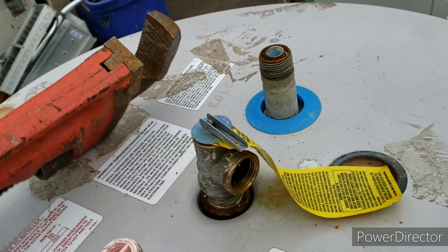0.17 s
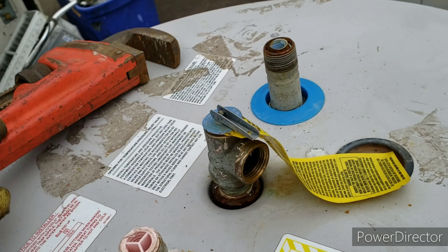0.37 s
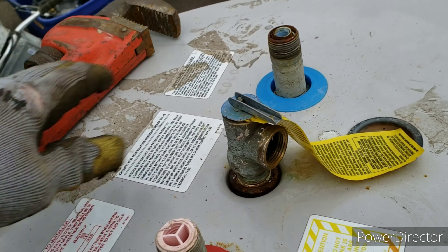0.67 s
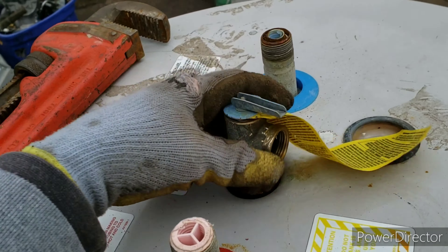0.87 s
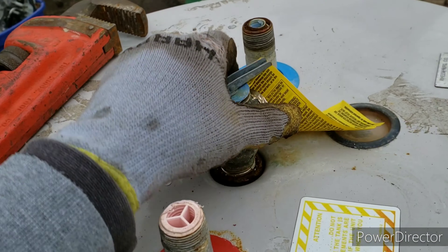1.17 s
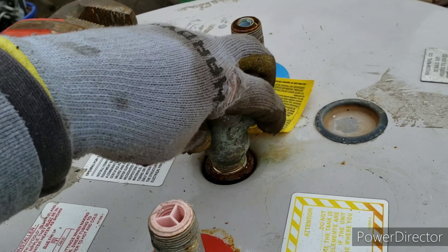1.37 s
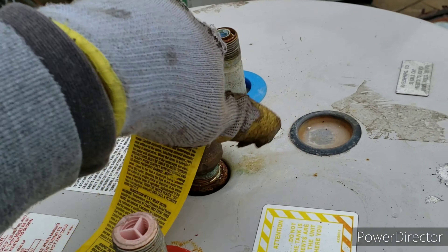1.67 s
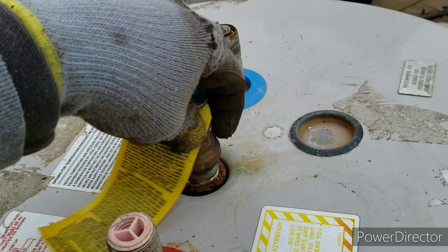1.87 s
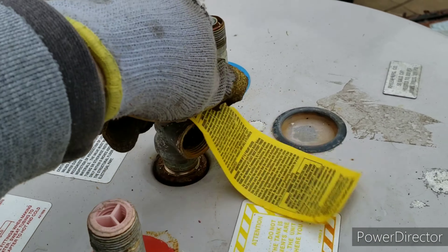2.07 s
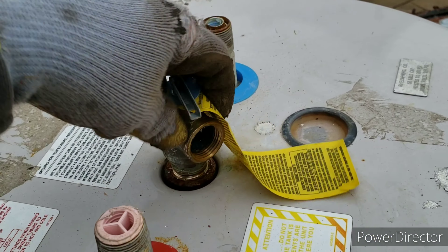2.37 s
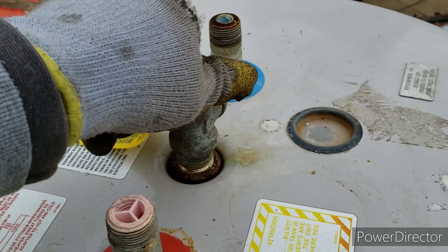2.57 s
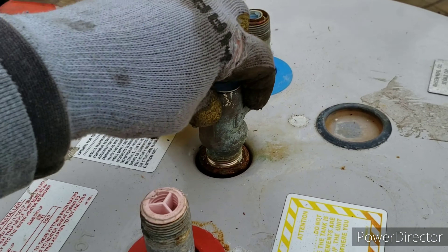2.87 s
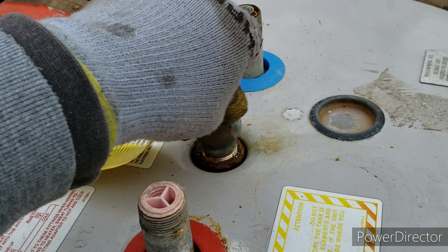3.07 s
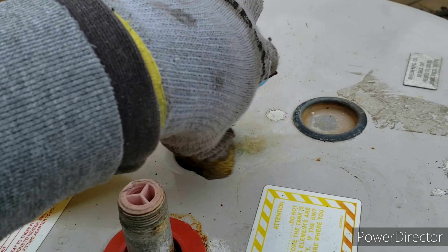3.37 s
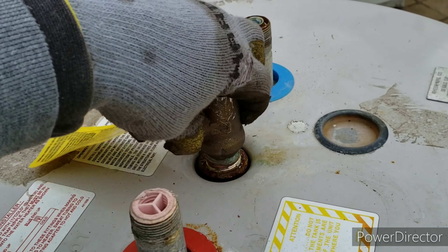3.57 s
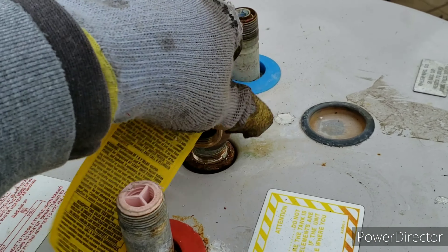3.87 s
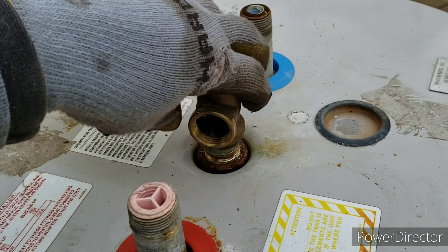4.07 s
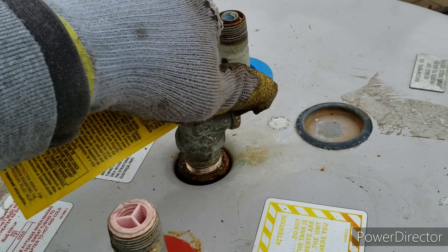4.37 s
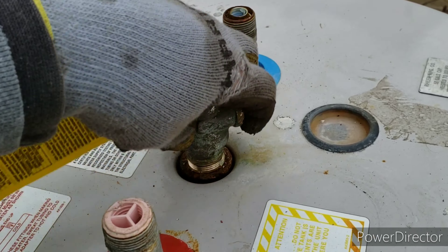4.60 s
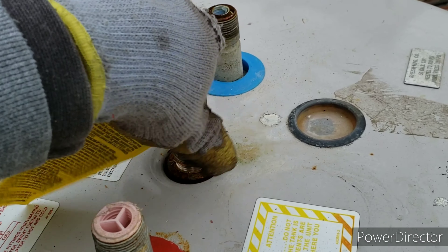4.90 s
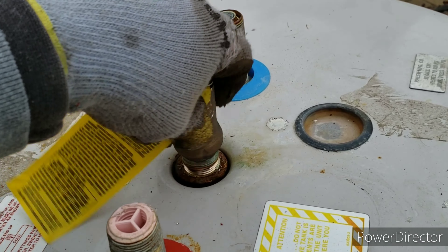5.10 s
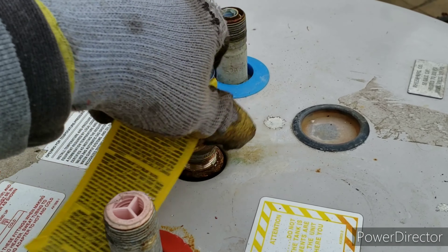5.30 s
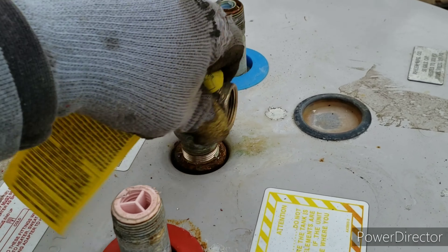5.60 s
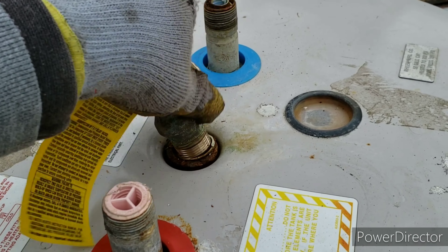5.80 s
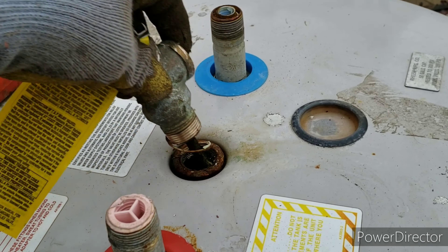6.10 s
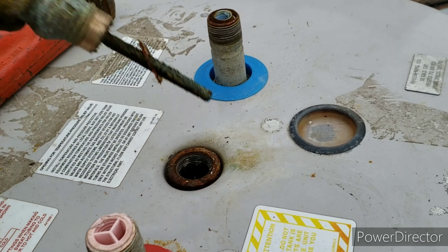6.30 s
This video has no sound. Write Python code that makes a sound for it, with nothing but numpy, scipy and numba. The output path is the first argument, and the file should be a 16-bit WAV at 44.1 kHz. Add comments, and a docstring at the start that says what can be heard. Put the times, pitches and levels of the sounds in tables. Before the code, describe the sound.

Outdoors, close to a metal tank, heard by a phone in near, dry stereo. At 0 seconds a steel wrench knocks and scrapes the sheet-metal lid: a sharp clank at 0.1, lighter taps, then from 0.4 to 0.95 a crowded, uneven clatter of bright ringing steel, hollow lid knocks and dull thuds, with a rough drag near 0.53. The rings are short, and it dies away by 1.1. From there a much quieter gloved hand works a threaded valve: gritty rubs and crackles, snapping around 2.0, 2.6, 3.2 and 3.7, sparse between. From 4.3 to 5.9 the strokes come closer together, fuller and scratchier, strongest near 5.25, with crisp ticks of scale. Near 6.3 a thin rod sings very faintly and high as it slides out. Soft swelling rumble, light hiss and a faint wavering hum, dropping lower around 3.7, continue to the end at about 6.4.

```python
"""Outdoors at a tank: a steel wrench is knocked and dragged on the sheet-metal lid, ringing damped modes.
Then a gloved hand works a threaded brass valve loose: noise grains make gritty rubbing and crackles of scale,
and a thin rod sings faintly as it slides out. Filtered noise gives low rumble and hiss, sines a faint far hum.
A phone with two microphone ports lies close by; the sound reaches the left port first."""
import sys
import numpy as np
from scipy import signal
from scipy.fft import rfft, irfft, next_fast_len
from scipy.io import wavfile
from scipy.ndimage import uniform_filter1d
from numba import njit

SR = 44100
rng = np.random.default_rng(int(sys.argv[2]) if len(sys.argv) > 2 else 0)


def int16_out(signal):
    """Quantize to a 16-bit WAV file."""
    q = np.round(np.clip(np.atleast_2d(signal).T, -1, 1) * 32767)
    wavfile.write(sys.argv[1], SR, q.astype(np.int16))


def natural_amplitude(level_db):
    """Convert a level in decibels to a linear amplitude factor, elementwise."""
    exponent = np.asarray(level_db, float) / 20
    return 10 ** exponent


N = 284445
T = np.arange(N) / SR

# spectrum of gritty contact: freq_hz, relative_level_db
GRIT_SPECTRUM = [(180, -31), (300, -1.5), (504, -6), (848, 1.5), (1580, 1.5), (2790, -4), (5100, -8),
                 (9010, -15.5), (12000, -6.5), (14700, -5), (15700, -5.5), (16500, -36.5)]
# strokes of the glove and turns of the thread: peak_s, level_db, low_band_body_db (relative to level_db),
# rise_ms per 9 dB, fall_ms per 9 dB
STROKE_ROWS = [(1.139, -50.5, 1, 59, 45), (1.277, -57, -9, 2, 10), (1.436, -35, -11.5, 11.3, 29),
               (1.541, -40, -15, 15, 55), (1.621, -47.5, -5.5, 51, 67), (1.801, -61, -34, 25, 17),
               (1.89, -53, -3.5, 1.5, 130), (1.965, -52, -5, 40, 18), (2.098, -33.5, -25.5, 39, 12),
               (2.186, -43.5, -9.5, 12.4, 25.5), (2.389, -57, -6, 1.9, 15), (2.619, -31.5, -10, 62, 17),
               (2.721, -50, -11, 20, 37), (2.858, -47.5, -1, 1.5, 45), (3.22, -48.5, -1, 97, 90),
               (3.403, -45.5, -10, 43, 54), (3.612, -54, -7, 44, 45), (3.697, -30.5, -8.5, 5.2, 14),
               (3.789, -54, 10.5, 30, 18), (3.858, -48.5, -2.5, 76, 35), (4.04, -49.5, -6.5, 120, 100),
               (4.303, -52.5, 1.5, 34, 36), (4.398, -38, -10, 18, 31), (4.56, -37, -5.5, 22, 20),
               (4.644, -54.5, -1.5, 5.6, 128), (4.809, -36.5, 1.5, 15.7, 24), (4.9, -49.5, -1.5, 52, 43),
               (4.977, -41.5, 2, 23.4, 39), (5.124, -46, 3, 45, 25), (5.251, -30, -6, 19.8, 20.7),
               (5.386, -41, -4.5, 50, 15), (5.434, -50.5, -11, 13, 37), (5.554, -59.5, 3.5, 38, 85),
               (5.744, -43, 3.5, 83, 47), (5.916, -39.5, -7.5, 31, 41), (6.316, -52, 2.5, 113, 20)]


def unit(x):
    """Scales to rms 1."""
    return x / np.sqrt(np.mean(x ** 2))


def curve(rows):
    """Interpolates the columns of a time table to one value a sample."""
    s, *columns = np.transpose(rows)
    return [np.interp(T, s, column) for column in columns]


def colour(x, points, lag_s=0., scale=0.95):
    """Filters by (Hz, dB) points on a log axis, dB times scale, with an optional delay."""
    size = next_fast_len(N + 4096)
    hz = np.fft.rfftfreq(size, 1 / SR) + 1
    at_hz, db = np.transpose(points)
    gain = natural_amplitude(scale * np.interp(np.log(hz), np.log(at_hz), db))
    delay = np.exp(-2j * np.pi * hz * lag_s)
    return irfft(rfft(x, size) * gain * delay, size)[..., :N]


def band(x, lo_hz, hi_hz):
    """Steep band-pass."""
    return signal.sosfilt(signal.butter(3, [lo_hz, hi_hz], "band", fs=SR, output="sos"), x)


def walk(rate_hz):
    """Random levels held 1 / rate_hz and slewed; spread near 1."""
    hold = max(int(SR / rate_hz), 1)
    steps = np.repeat(rng.standard_normal(N // hold + 1), hold)
    return 1.096 * uniform_filter1d(steps, hold)[:N]


@njit
def resonate(push, pole, keep):
    """One damped mode; keep under 1 takes more ring away on that sample."""
    out, z = np.empty(len(push)), 0j
    for i in range(len(push)):
        z = z * pole * keep[i] + push[i] + 1e-18
        out[i] = z.imag
    return out


def ring(pushes, modes, keep):
    """Sums damped modes, each driven by its own row of pushes."""
    out = 0
    for push, (hz, db, t60_s) in zip(pushes, modes):
        decay = np.log(1000) / (max(t60_s, .005) * SR)
        pole = np.exp(2j * np.pi * hz / SR - decay)
        out = out + natural_amplitude(db) * resonate(push, pole, keep)
    return out


def strikes(times_s, db, modes, scatter_db):
    """A blow and two quick bounces on each mode; where it lands changes size and sign."""
    pushes = np.zeros((len(modes), N))
    late_s = rng.uniform(0.0013, .005, (len(times_s), 2)).cumsum(axis=1).T
    for after_s, bounce_db in zip([0., *late_s], (0, -7, -11)):
        chance = rng.standard_normal((len(times_s), 2 * len(modes)))
        sizes = natural_amplitude(scatter_db * chance[:, ::2]) * np.sign(chance[:, 1::2])
        at = ((times_s + after_s) * SR).astype(int)
        pushes[:, at] += (natural_amplitude(db + bounce_db)[:, None] * sizes).T
    return pushes


def bursts(times_s, db, rise_ms, fall_ms):
    """Envelope of bursts: exponential rise to the peak and fall after it, 9 dB in the given times."""
    env = np.zeros(N)
    for s, d, rise, fall in zip(times_s, db, np.clip(rise_ms, .1, 400), np.clip(fall_ms, .3, 400)):
        start = max(int((s - rise * 0.003) * SR), 0)  # 27 dB under the peak
        end = int((s + fall * 0.012) * SR)
        ms = (T[start:end] - s) * 1000
        env[start:end] += natural_amplitude(d + 9.01 * np.minimum(ms / rise, -ms / fall))
    return env


def wrench():
    """Blows and a chattering drag ring the steel and the lid; blows also thud the tank."""
    # blows: start_s, steel_db, lid_db, thud_db (relative levels)
    blow_rows = [(0.008, -31, -43, -73), (0.0827, -43, -22.5, -31.5), (0.0994, -12, -73, -55),
                 (0.152, -45, -34, -38), (0.227, -44.5, -26, -65), (0.349, -53, -29.5, -57.5),
                 (0.4122, -26, -19.5, -44), (0.422, -13.5, -25.5, -39), (0.432, -7, -27, -60),
                 (0.456, -8.5, -30.5, -64.5), (0.491, -11.5, -21, -61), (0.506, -15.5, -37, -59.5),
                 (0.521, -16.5, -31.5, -20), (0.528, -14, -27, -31.5), (0.541, -12, -34, -39),
                 (0.553, -13, -35.5, -61), (0.595, -20.5, -19.5, -52), (0.651, -29.5, -20.5, -28.5),
                 (0.663, -25, -20.5, -36.5), (0.672, -12, -20.5, -52.5), (0.679, -23.5, -30, -69),
                 (0.724, -19, -38.5, -60), (0.74, -17.5, -20.5, -34), (0.784, -18, -17.5, -70),
                 (0.795, -31, -20.5, -32), (0.81, -33, -39, -61), (0.839, -17.5, -27.5, -60),
                 (0.856, -26, -21, -34), (0.89, -50, -17, -55), (0.917, -23, -24.5, -40),
                 (0.941, -42.5, -25.5, -64), (0.96, -25, -31, -47), (1.04, -39, -39.5, -52),
                 (1.07, -49, -62, -48)]
    # drags across the lid: peak_s, steel_db, lid_db (relative levels), rise_ms per 9 dB, fall_ms per 9 dB
    drag_rows = [(0.01, -24.5, -55, 5, 13.4), (0.1, -21.5, -32, 9.4, 44), (0.222, -47.5, -33, 3, 126),
                 (0.418, -23.5, -18, 2.5, 27), (0.536, -13, -9.5, 27, 15), (0.58, -37.5, -34, 79, 390),
                 (0.68, -25, -33.5, 17, 86), (0.892, -28.5, -32, 200, 82)]
    # modes of wrench, lid and tank body: freq_hz, relative_level_db, t60_s (before damping by hand and blows)
    steel_modes = [(951, -7, .5), (1367, -19, .15), (1614, -14, .3), (1911, -2, .35), (2863, -9, .3),
                   (2988, -12, .2), (3085, 1, .16), (3147, 1, .25), (3260, 1, .06), (3420, 1, .04),
                   (3600, 2, .04), (3850, -4, .03), (4242, -10, .2), (4546, -4, .28), (4678, -10, .25),
                   (5900, -12, .1), (6170, -3, .3), (6370, -3, .25), (7786, -4, .12), (8785, -13, .2),
                   (9453, -21, .2), (10152, -21, .2), (10778, -13, .25), (10895, -8, .15), (11080, -12, .1),
                   (13105, -15, .15), (13342, -10, .2), (13555, -12, .15), (13786, -13, .25),
                   (14935, -17, .15)]
    lid_modes = [(511.5, -12.5, .12), (612.6, -7.5, 0.087), (671, -2.5, 0.074), (750, -3.5, 0.052),
                 (852, -3, 0.05), (1063, -8, 0.04), (1410, -7.5, 0.023)]
    tank_modes = [(70, -2.5, 0.11), (167, -11, .05), (277, -8, 0.062)]
    s, db, lid_db, thud_db = np.transpose(blow_rows)
    peak_s, drag_steel_db, drag_lid_db, rise_ms, fall_ms = np.transpose(drag_rows)

    lift_s, lift_fade_s = 1.132, 0.08  # the wrench leaves the lid
    on_lid = np.clip((lift_s - T) / lift_fade_s, 0, 1)
    drag_steel = bursts(peak_s, drag_steel_db, rise_ms, fall_ms) * on_lid
    drag_lid = bursts(peak_s, drag_lid_db, rise_ms, fall_ms) * on_lid
    chatter = unit(natural_amplitude(6.2 * walk(150)) * rng.standard_normal(N))

    undamped = np.ones(N)
    lid_pushes = strikes(s, lid_db - 2.5, lid_modes, 1.9) + chatter * drag_lid * natural_amplitude(-32.0)
    lid = ring(lid_pushes, lid_modes, undamped)
    thud = ring(strikes(s, thud_db + 4.5, tank_modes, 0.74), tank_modes, undamped)

    # the hand damps the steel by 70 dB/s; a hard blow stops part of the earlier ring
    keep = np.full(N, natural_amplitude(-70 / SR))
    keep[(s * SR).astype(int)] = np.clip(1 - 0.95 * natural_amplitude(db + 16.5), .45, 1)
    steel_pushes = strikes(s, db - 10, steel_modes, 2.1) + chatter * drag_steel * natural_amplitude(-42.0)
    steel = ring(steel_pushes, steel_modes, keep)

    # the contact itself cracks and scrapes broadband
    crack = bursts(s, db - 10.5, np.full(len(s), .3), np.full(len(s), 4.))
    scrape = drag_steel * natural_amplitude(-9.5 + 5.17 * walk(200))
    grit = unit(band(colour(rng.standard_normal(N), GRIT_SPECTRUM), 900, 13000))
    return band(steel + lid, 190, 17000) + band(thud, 42, 2000) + (crack + scrape) * grit


def valve():
    """Grit in the thread and the glove: grains shared by three bands, under rubbing and crackles."""
    # crackles: peak_s, mid_db, low_db, high_db (relative levels), fall_ms per 9 dB (scaled by band below)
    crackle_rows = [(1.126, -36.5, -32, -35, 2.3), (1.139, -32, -34, -37, 3.9),
                    (1.2754, -35.5, -39.5, -43.5, 4), (1.458, -29, -36.5, -29.5, 4.8),
                    (1.5376, -36, -62, -30.5, 8.2), (1.6064, -33, -44, -24, 2.6),
                    (1.6187, -28.5, -39, -32.5, 6.8), (1.648, -32, -45, -40.5, 2.4),
                    (1.6813, -33, -42, -39, 2.7), (1.7253, -45.5, -78, -37, 4.6),
                    (1.785, -53, -81, -45, 11), (1.887, -35, -64, -29, 1.7), (1.978, -41, -43, -26.5, 3.8),
                    (1.994, -22.5, -38.5, -18.5, 3.06), (2.0429, -39, -43, -34, 6.8),
                    (2.0583, -47, -53, -27.5, 16), (2.1005, -47, -49.5, -21.5, 8.8),
                    (2.1235, -35.5, -61, -36, 1.7), (2.177, -46, -50, -55, 7.1),
                    (2.3897, -40.5, -51.5, -38.5, 5.5), (2.4294, -48, -51.5, -40, 8.9),
                    (2.5584, -38, -65, -34, 9), (2.5742, -31, -36.5, -39, 3.8), (2.631, -38, -64, -32, 17),
                    (2.709, -41, -58, -32.5, 5.4), (2.8561, -48, -47, -44.5, 1.5),
                    (2.9259, -44, -45, -45, 1.7), (3.0744, -43.5, -51, -47, 3.2),
                    (3.1377, -44, -50.5, -44, 2.5), (3.17, -34.5, -48, -36.5, 4.5),
                    (3.2237, -21.5, -25, -33.5, 3.4), (3.2538, -33, -47, -35.5, 0.87),
                    (3.2751, -29, -34, -25, 0.85), (3.2845, -25.5, -38.5, -23.5, 0.55),
                    (3.3078, -39, -47, -48, 1.3), (3.3972, -31, -59, -29.5, 6.4),
                    (3.4995, -41, -56, -50, 4.3), (3.6147, -39, -43, -39.5, 3.5),
                    (3.6865, -28.5, -49, -23.5, 0.65), (3.7486, -38.5, -46, -27.5, 0.83),
                    (3.7656, -42, -54, -38, 4), (3.7878, -54, -39, -43.5, 3), (3.881, -38.5, -47, -50, 2.6),
                    (4.0086, -34, -63, -41.5, 5.3), (4.0301, -28, -65, -22.5, 3.5),
                    (4.0535, -33.5, -52, -37, 3), (4.1634, -46, -54, -38.5, 2.1),
                    (4.2422, -54, -37.5, -62, 2.8), (4.2777, -42, -33, -69, 0.31),
                    (4.297, -21.5, -32.5, -27.5, 2), (4.4074, -25, -40, -32.5, 0.64),
                    (4.4171, -23, -53, -20.5, 0.9), (4.458, -44.5, -46.5, -45, 5.7),
                    (4.538, -40, -64, -40, 6), (4.5585, -57, -39, -47, 8.7), (4.581, -40, -54, -39.5, 14),
                    (4.6408, -35, -60, -22.5, 0.5), (4.6864, -42, -50, -36.5, 4.2),
                    (4.7766, -19, -49, -22.5, 1.2), (4.8094, -24.5, -25.5, -30.5, 6.6),
                    (4.8408, -31.5, -36, -40, 1.6), (4.9788, -30, -37, -24, 5.7),
                    (5.0168, -22.5, -48, -25.5, 1.3), (5.0573, -36, -53, -37, 9.9),
                    (5.118, -26, -38.5, -21, 1.6), (5.2102, -34, -34, -30.5, 2.5),
                    (5.2281, -19.5, -29, -16.5, 2), (5.2476, -19.5, -32.5, -25.5, 6.5),
                    (5.387, -31, -57, -27, 7.2), (5.43, -52, -68, -28, 2.9),
                    (5.5066, -35.5, -57, -31.5, 1.7), (5.5512, -29.5, -37, -33.5, 4.2),
                    (5.6475, -33.5, -30.5, -49.5, 2.1), (5.6668, -34, -50, -34, 3.2),
                    (5.6961, -40, -48, -41.5, 3.4), (5.748, -24, -24, -29.5, 1),
                    (5.8768, -40, -46, -38.5, 11), (5.8994, -41, -49, -39.5, 2.3),
                    (5.941, -39.5, -50, -35.5, 2.2), (6.0009, -56, -65, -30, 0.9),
                    (6.1056, -42, -61, -53, 2.3), (6.233, -45, -55, -39, 2.3),
                    (6.326, -42.5, -51, -34, 1.5)]
    # edges of the low, middle and high band: freq_hz
    edges_hz = (200, 2500, 9000, 16500)
    snap_low_hz, crackle_low_hz = 700, 450  # snaps and crackles have no bass
    rubs = rubbing()
    s, mid_db, low_db, high_db, fall_ms = np.vstack([crackle_rows, ticks(rubs[1])]).T
    slowness_ms = 0.32 + 0.24 * fall_ms
    grains = colour(natural_amplitude(3.46 * walk(400) + 2.4 * walk(90)) * rng.standard_normal(N), GRIT_SPECTRUM)
    sharp = colour(natural_amplitude(4.63 * walk(1200)) * rng.standard_normal(N), GRIT_SPECTRUM)
    layers = zip((low_db, mid_db, high_db), rubs, (1.6, 1.1, .8))  # low bands linger longer
    out, snaps = 0, np.zeros(N)
    for k, (db, rub, linger) in enumerate(layers):
        lo_hz, hi_hz = edges_hz[k:k + 2]
        out = out + rub * natural_amplitude(2.2 * walk(40)) * unit(band(grains, lo_hz, hi_hz))
        crackle = bursts(s, db + 2.0, 0.58 * slowness_ms, linger * fall_ms)
        out = out + crackle * unit(band(sharp, max(lo_hz, crackle_low_hz), hi_hz))
        # each crackle has a one-sample snap at its peak, stronger the more sudden it is
        snaps[(s * SR).astype(int)] = natural_amplitude(db + 18) / (1 + slowness_ms ** 2)
        out = out + band(snaps, max(lo_hz, snap_low_hz), hi_hz)
    return out


def rubbing():
    """Envelopes of the strokes in the low, middle and high band; less body means a brighter stroke."""
    s, db, body_db, rise_ms, fall_ms = np.transpose(STROKE_ROWS)
    treble_db = -3 - 0.19 * body_db
    return [bursts(s, db + d, rise_ms, fall_ms) for d in (body_db, 0, treble_db)]


def ticks(rub):
    """Small crackles at chance moments, sized by the rubbing under them; columns as crackle_rows."""
    # low, middle and high band of a tick: relative_level_db
    tick_bands_db = (-9.5, -0.5, 2)
    count, over_rub_db, spread_db, typical_fall_ms = 120, 3.5, 5.5, 1.2
    s = rng.uniform(STROKE_ROWS[0][0], STROKE_ROWS[-1][0], count)
    chance = rng.standard_normal((count, 4)).T
    db = 20 * np.log10(rub[(s * SR).astype(int)] + 1e-6) + over_rub_db
    low, mid, high = db + np.array(tick_bands_db)[:, None] + spread_db * chance[:3]
    return np.transpose([s, mid, low, high, typical_fall_ms * natural_amplitude(3.7 * chance[3])])


def rod():
    """The thin sensing rod under the valve sings faintly: noise rubs its modes as it slides past the rim."""
    # rod modes: freq_hz, relative_level_db, t60_s
    rod_modes = [(5960, -4, 0.063), (10325, -7, .1), (11200, 1.5, 0.18), (13108, -7.5, 0.089)]
    # rod sliding out: time_s, relative_level_db
    slide_rows = [(6.1, -79), (6.14, -72), (6.3, -48.5), (6.33, -54), (6.34, -90)]
    pushes = rng.standard_normal((len(rod_modes), N)) * natural_amplitude(3 * walk(200))
    slide_db = np.interp(T, *np.transpose(slide_rows), -120, -120)
    return unit(ring(pushes, rod_modes, np.ones(N))) * natural_amplitude(slide_db)


def ports(x, lean, lag_s):
    """The phone body shades one port, and the right port hears a little later."""
    return np.array([colour(x, lean, 0., 1 / 2), colour(x, lean, lag_s, -1 / 2)])


def scatter(direct):
    """Short echo tails from lid, hand and tool; their shares shift as the hand moves."""
    t = T[:1500]
    bright = colour(direct, [(200, -9), (1000, -4.5), (6000, 3.5)])
    out = 0
    for _ in range(3):
        tails = rng.standard_normal((2, len(t))) * natural_amplitude(-60 * t / .012) * (t > .0003)
        tails = tails / np.sqrt(np.sum(tails ** 2, axis=1, keepdims=True))
        out = out + walk(20) * signal.fftconvolve(bright, tails, axes=1)[:, :N]
    return natural_amplitude(-7) * out


def air():
    """Distant rumble and hiss from coloured noise; the bass is alike at both ports and swells slowly."""
    # spectrum of the air: freq_hz, relative_level_db
    air_spectrum = [(15, -34.5), (25, -6.5), (70, -1.5), (208, -7), (616, -18.5), (926, -16.5), (1060, -28),
                    (5410, -45.5), (8820, -55.5), (15200, -29), (16500, -48)]
    # rumble: time_s, level_db (taken relative to the last row)
    swell_rows = [(0.0, -55), (0.47, -49), (0.63, -61.5), (0.77, -65), (1.2, -61), (2.82, -58.5),
                  (4.26, -52), (4.94, -49), (6.25, -53), (6.45, -58)]
    mid, side = colour(rng.standard_normal((2, N)), air_spectrum)
    side = colour(side, [(60, -23), (500, -3.5), (1500, 2)])
    both = unit(mid + side * np.array([[1], [-1]])) * natural_amplitude(-61.5 + 1.7 * walk(9.0))
    bass = signal.sosfilt(signal.butter(2, 350, fs=SR, output="sos"), both)
    swell_db = curve(swell_rows)[0]
    return both - bass + bass * natural_amplitude(swell_db - swell_db[-1])


def hum():
    """Faint far hum: a wavering low tone with two weaker overtones."""
    # hum: time_s, pitch_hz, level_db (of the fundamental; pitch and level waver about these)
    hum_rows = [(0, 150.2, -75.5), (3.5, 151.5, -69.5), (3.7, 120.6, -63.5), (3.9, 95.6, -61),
                (6.3, 96.7, -60.5), (6.45, 95.4, -63.5)]
    hz, db = curve(hum_rows)
    phase = 2 * np.pi * np.cumsum(hz * (1 + .025 * walk(4.1))) / SR
    tone = np.sin(phase) + 0.5 * np.sin(2 * phase) + 0.52 * np.sin(3 * phase)
    return natural_amplitude(db + 2.3 * walk(6.1)) * tone


def scene():
    """Direct sound at both ports, each with its own echoes, over the background."""
    # port balance of wrench and valve: freq_hz, left_minus_right_db
    wrench_lean = [(300, 0.5), (1400, -2.5), (3000, 6), (6000, 2), (9000, 1), (14000, 10.5)]
    valve_lean = [(60, 6), (110, -1.5), (200, 6), (380, -2.5), (700, 1.5), (1290, -6.5), (2380, 0),
                  (4400, -3.5), (8120, 3), (15000, 5)]
    wrench_lag_s, valve_lag_s = 0.0002172, 0.00017  # right port after left
    direct = ports(wrench(), wrench_lean, wrench_lag_s)
    direct = direct + ports(valve() + rod(), valve_lean, valve_lag_s)
    return natural_amplitude(-1.5) * (direct + scatter(direct)) + air() + hum()


def roll_off(x):
    """The treble ends steeply here."""
    return signal.sosfilt(signal.butter(12, 16630, fs=SR, output="sos"), x)


def record(dry):
    """The phone cuts the deepest bass, rounds the loudest peaks and cuts the top."""
    x = signal.sosfilt(signal.butter(2, 25, "high", fs=SR, output="sos"), dry)
    x = signal.sosfilt(signal.ellip(8, .2, 70, 16400, fs=SR, output="sos"), np.tanh(x))
    return roll_off(x)


dry = scene()
out = record(dry)
int16_out(out)
```